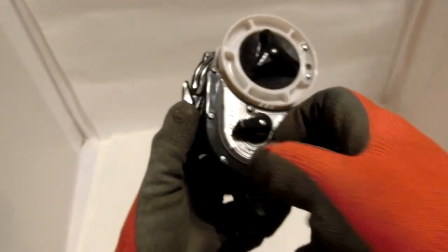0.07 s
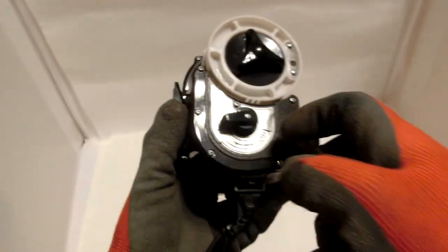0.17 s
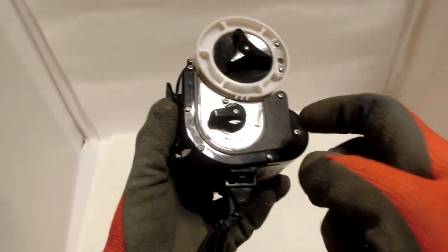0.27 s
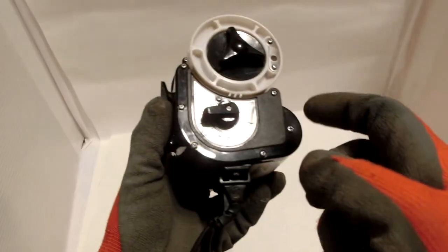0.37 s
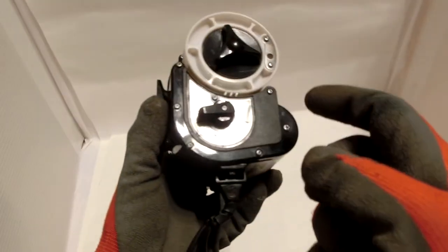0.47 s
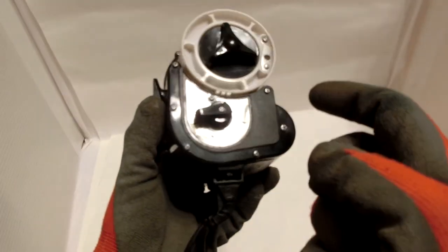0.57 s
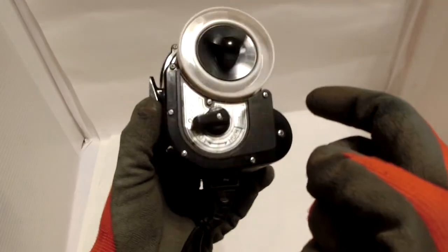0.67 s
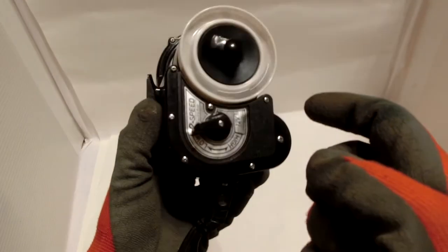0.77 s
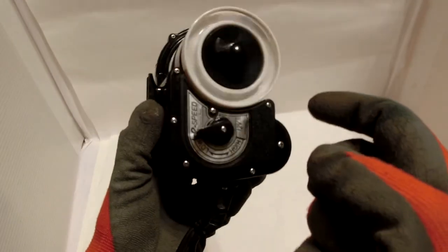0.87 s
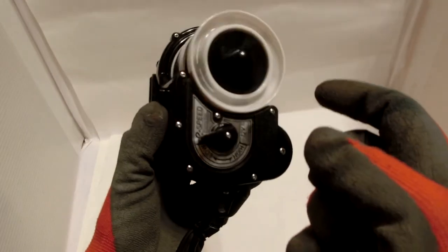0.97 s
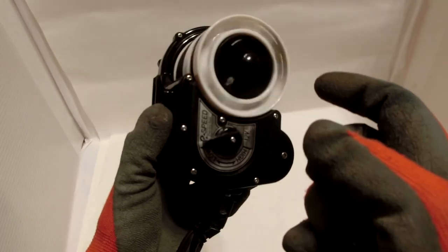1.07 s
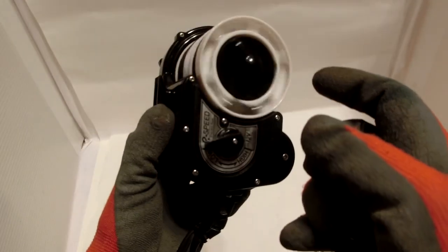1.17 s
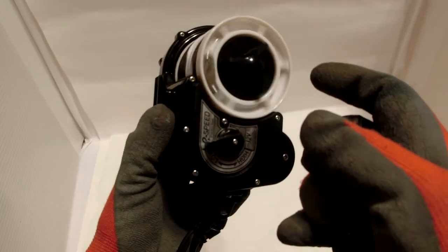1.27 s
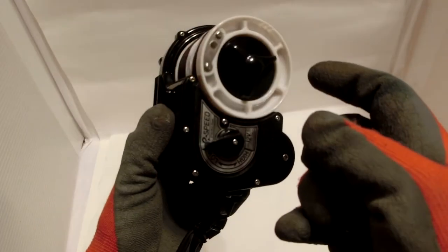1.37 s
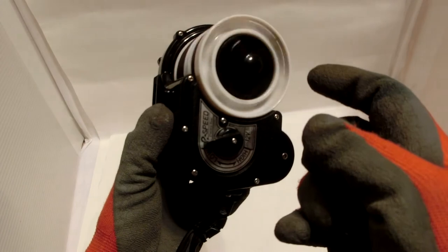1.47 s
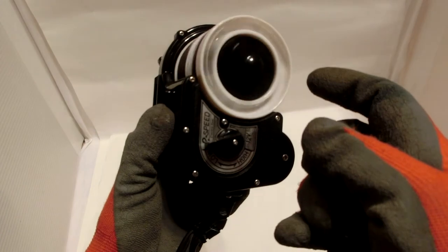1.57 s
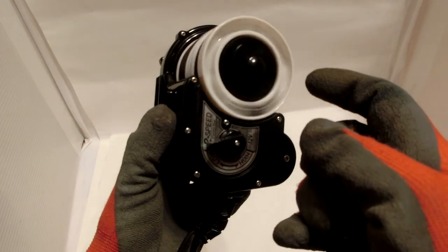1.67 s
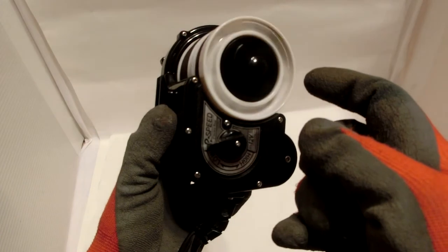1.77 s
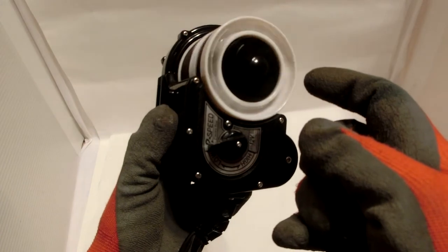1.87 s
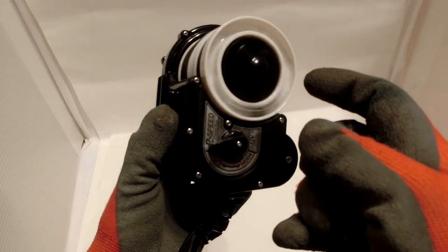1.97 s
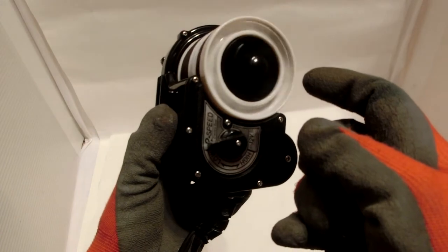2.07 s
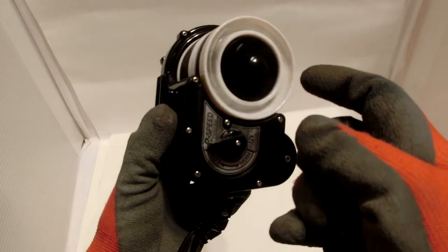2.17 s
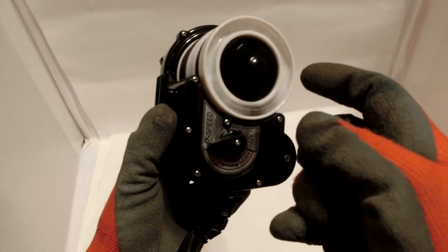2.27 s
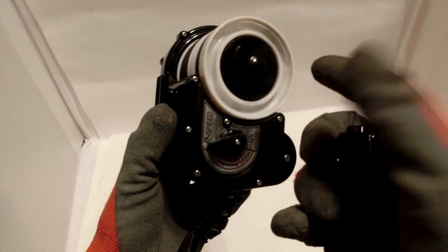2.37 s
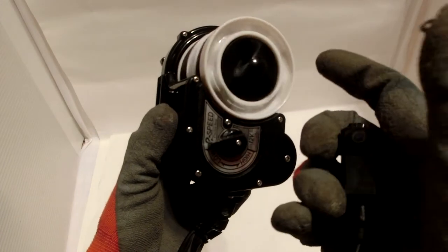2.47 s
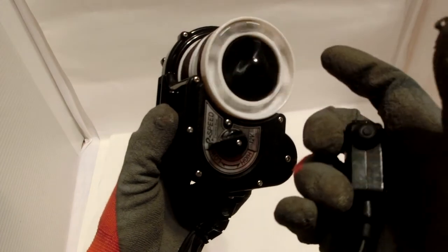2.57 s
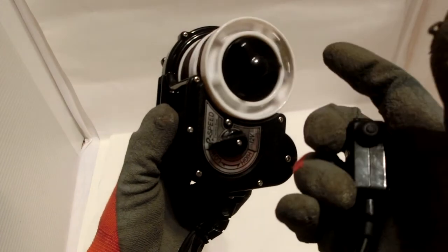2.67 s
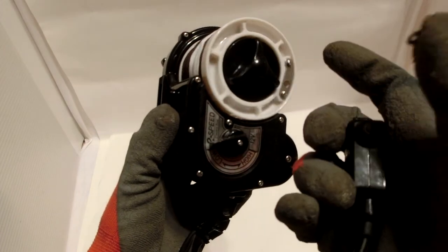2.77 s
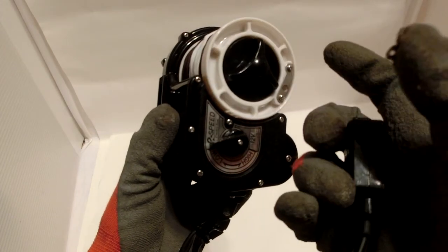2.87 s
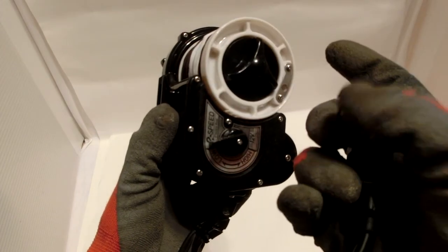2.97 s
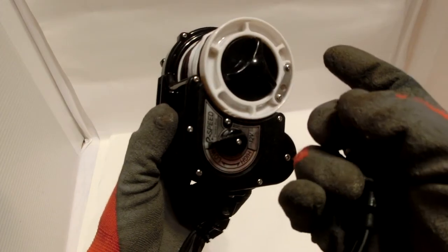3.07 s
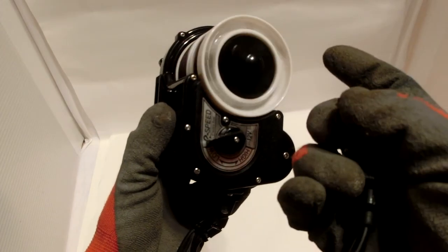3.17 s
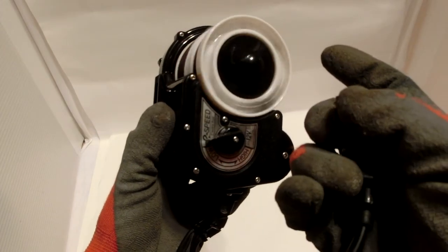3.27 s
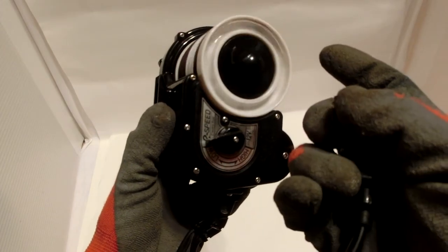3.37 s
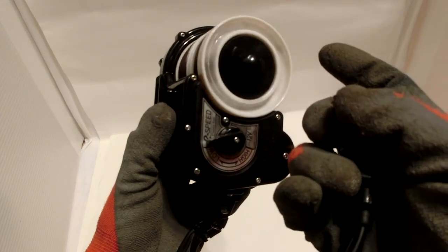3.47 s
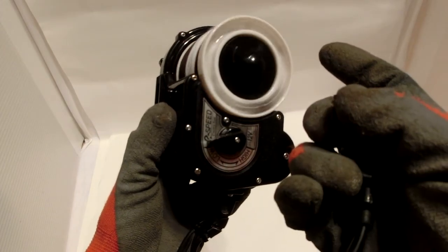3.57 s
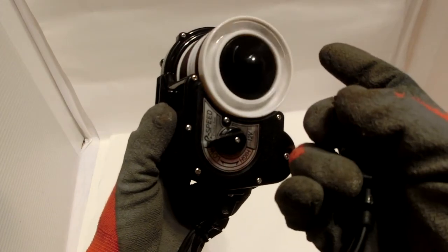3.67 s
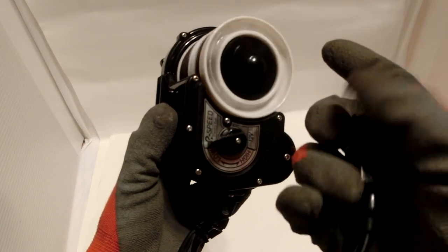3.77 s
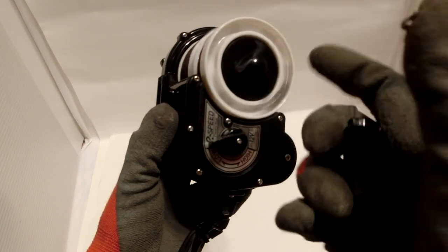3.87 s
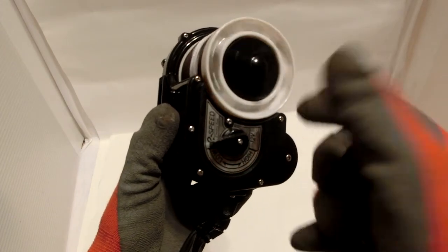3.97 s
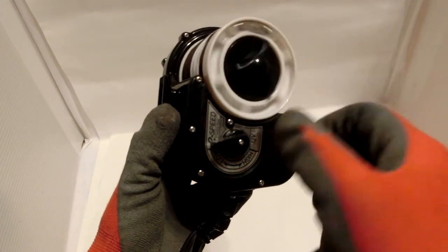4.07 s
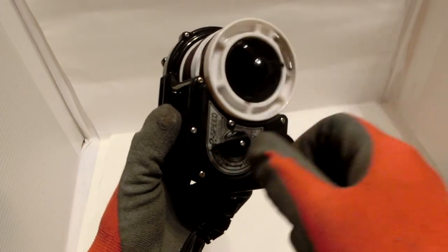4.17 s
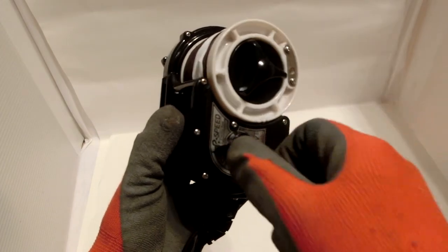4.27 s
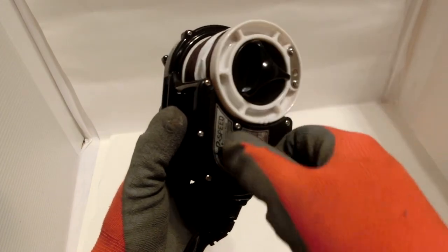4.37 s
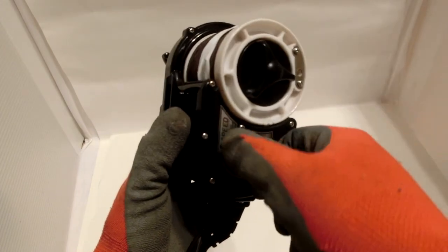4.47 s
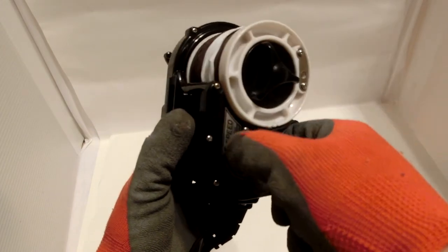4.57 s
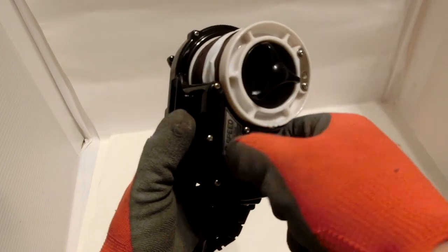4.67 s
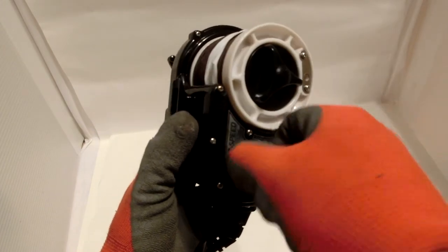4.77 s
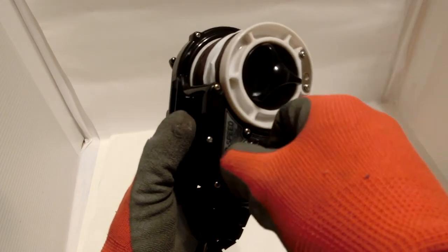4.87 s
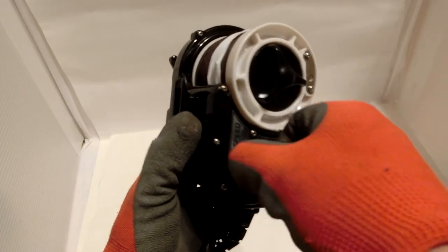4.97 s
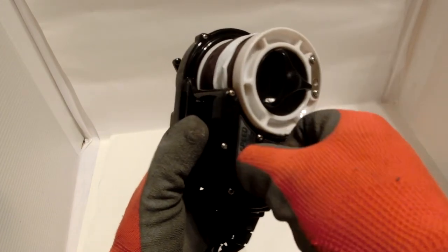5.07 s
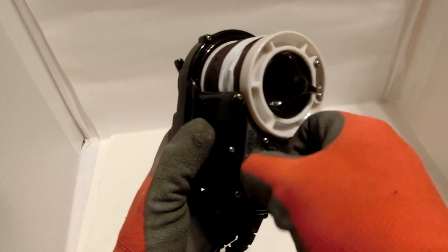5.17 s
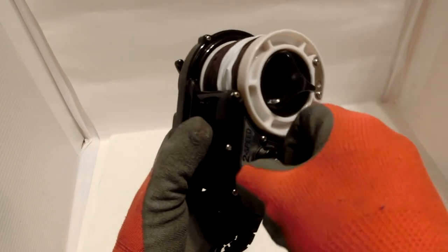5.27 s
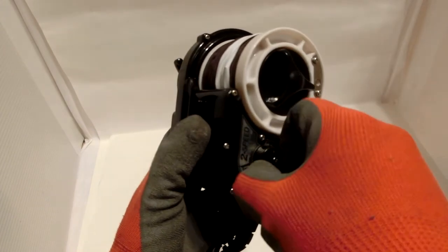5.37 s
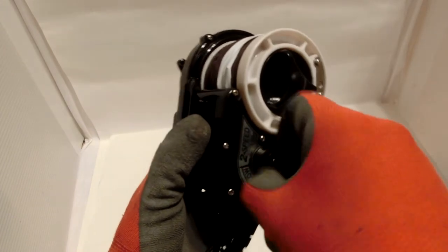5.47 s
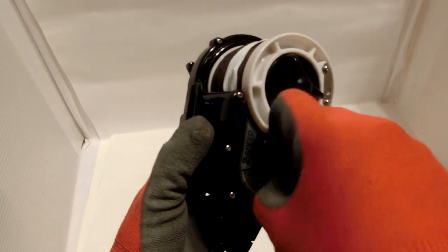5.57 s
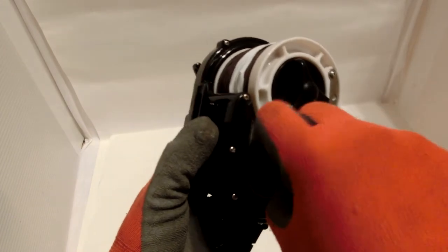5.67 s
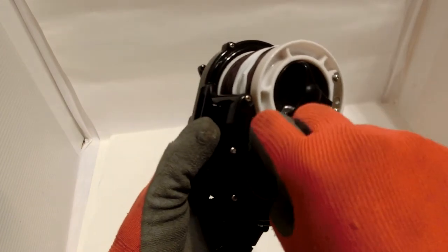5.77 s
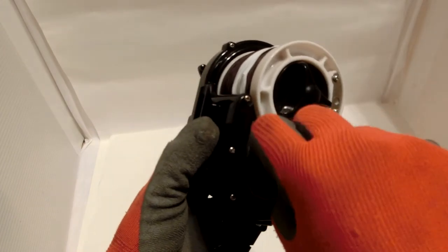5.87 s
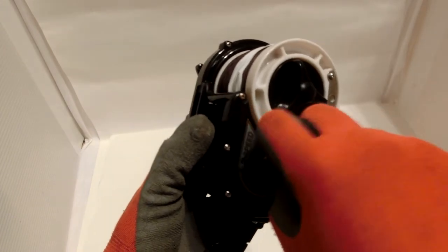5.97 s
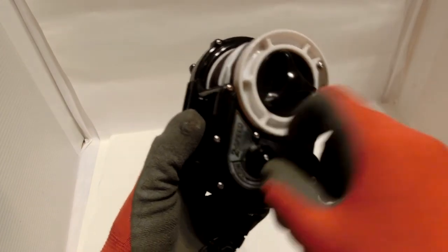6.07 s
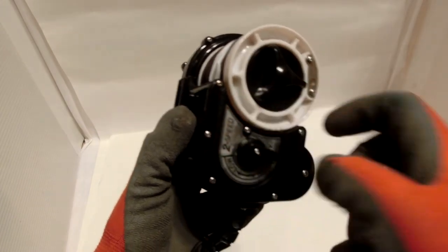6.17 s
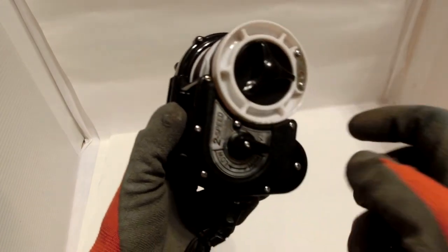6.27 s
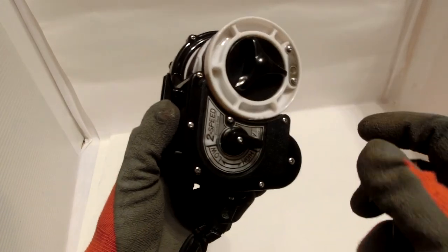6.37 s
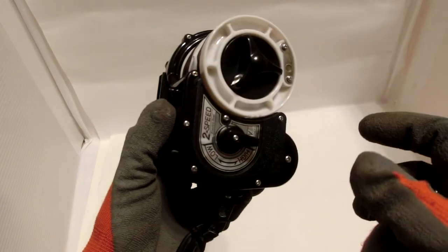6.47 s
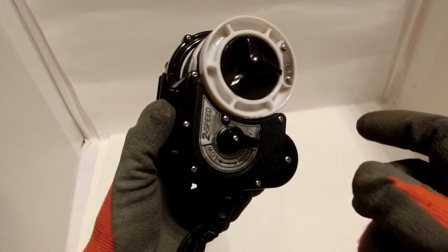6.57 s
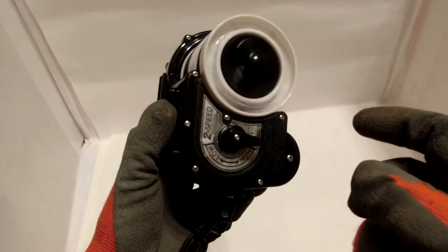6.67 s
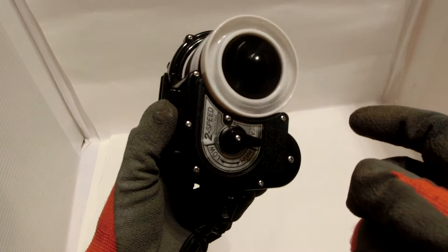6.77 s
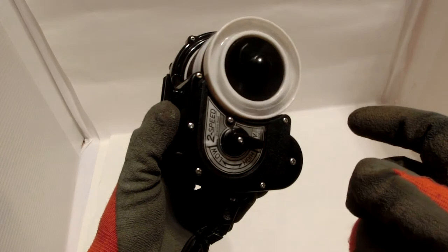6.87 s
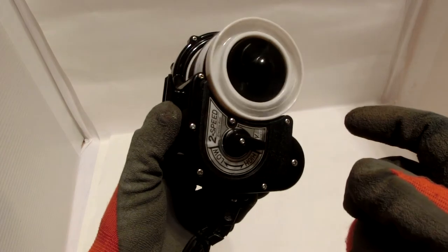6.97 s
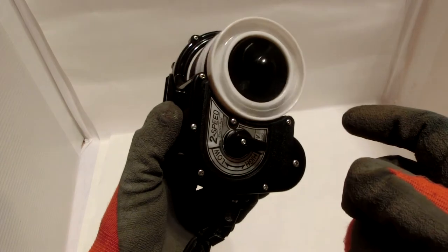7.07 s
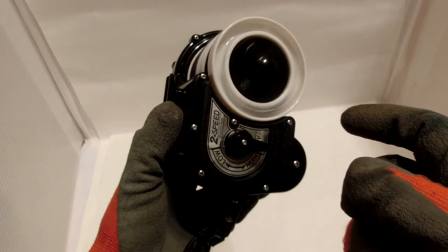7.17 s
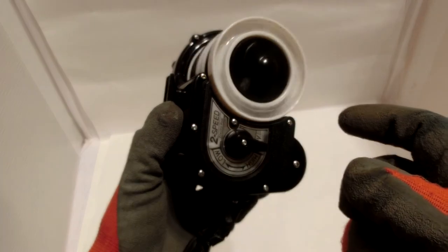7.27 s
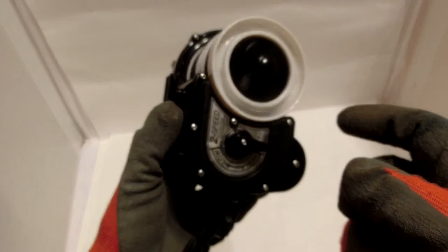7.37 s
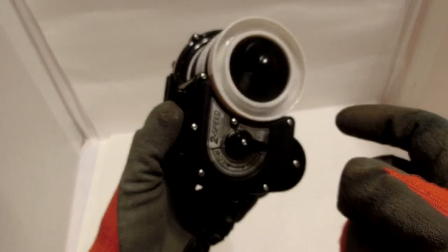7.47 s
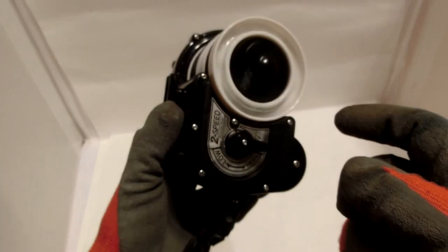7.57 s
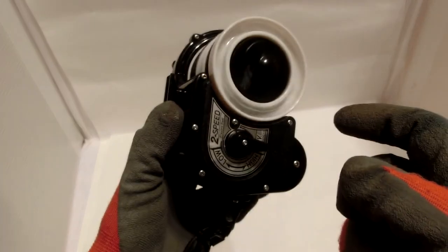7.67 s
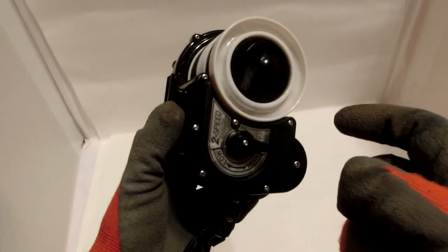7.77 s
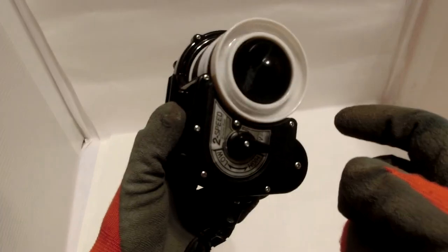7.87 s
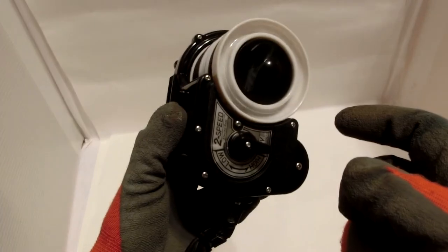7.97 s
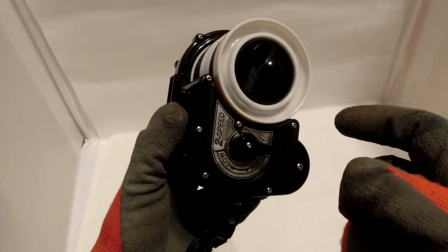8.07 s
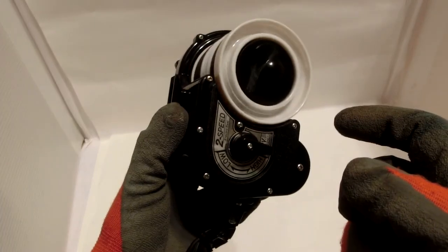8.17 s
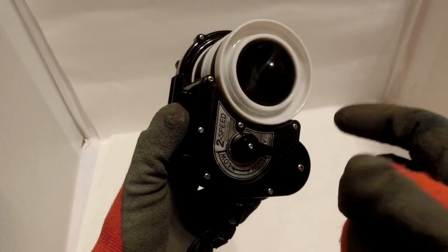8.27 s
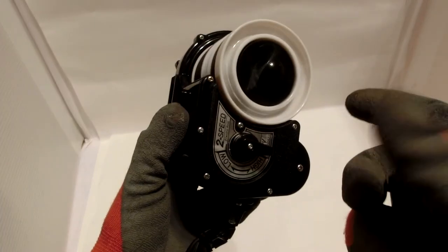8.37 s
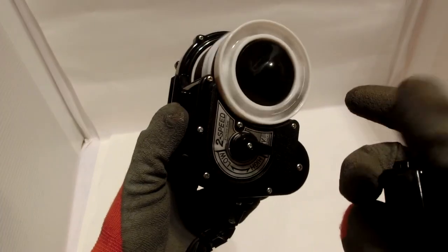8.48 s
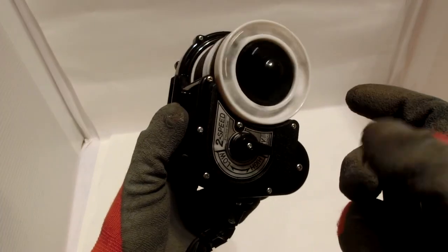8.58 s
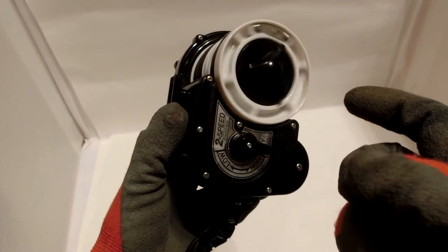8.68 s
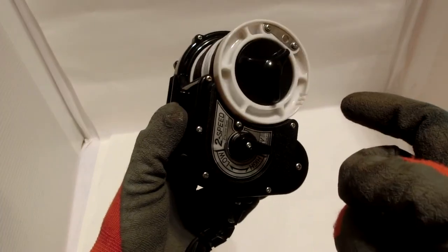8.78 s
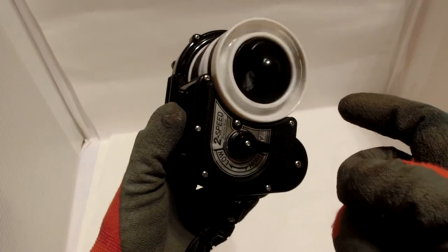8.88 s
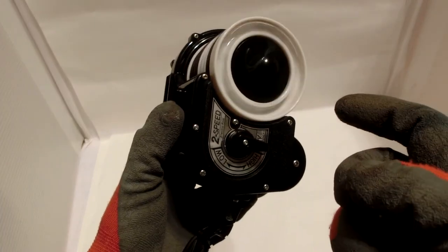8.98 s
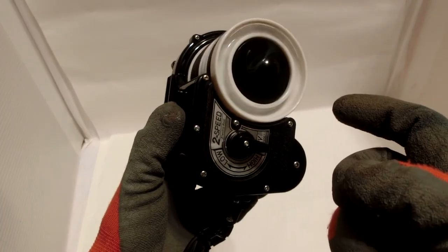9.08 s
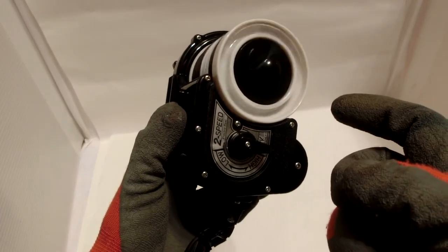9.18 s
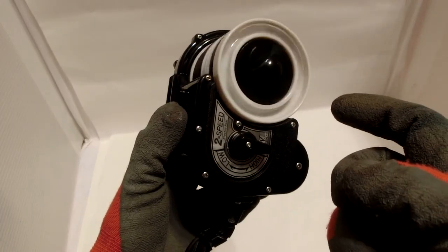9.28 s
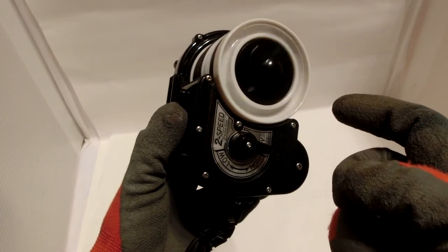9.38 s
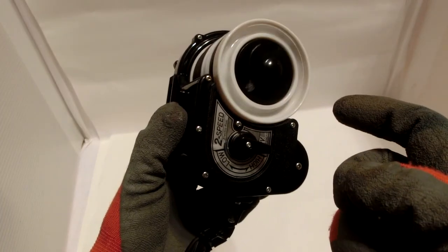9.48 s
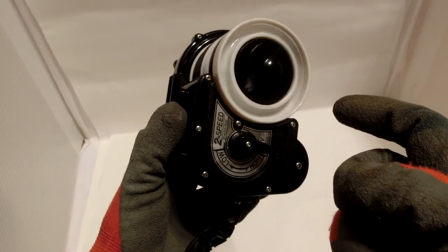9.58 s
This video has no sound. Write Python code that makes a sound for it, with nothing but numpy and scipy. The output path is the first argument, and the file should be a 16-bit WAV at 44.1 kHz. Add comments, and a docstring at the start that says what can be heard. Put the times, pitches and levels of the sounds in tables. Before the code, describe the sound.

Close up in a small room, the motor of an electric fishing reel whirs and buzzes three times, its ratchet clicking rapidly and slowing after each burst while the spool knocks lightly. In a pause come soft glove rubs, little taps and one hard snap of the gear lever. The reel then runs twice more, with faster buzzing clicks and a stronger high whine.

```python
"""An electric fishing reel, close in a small room, spins its spool three times in low gear, twice in high.
A pawl rattles over the ratchet, the motor whines and buzzes, the gears grind and the spool knocks once a
turn. Each run but the last coasts down to single clicks. Between low and high gear a gloved hand works
the speed lever, which snaps over."""
import sys
import numpy as np
from scipy import signal
from scipy.fft import rfft, irfft
from scipy.io import wavfile
from scipy.ndimage import uniform_filter1d, minimum_filter1d

SR = 44100
rng = np.random.default_rng(int(sys.argv[2]) if len(sys.argv) > 2 else 0)


def persist_wave(psi):
    """Save psi, clipped to +-1, as 16-bit WAV."""
    counts = np.round(np.clip(psi, -1, 1) * 32767).astype(np.int16)
    wavfile.write(sys.argv[1], SR, np.atleast_2d(counts).T)


N = 424679
TIME = np.arange(N) / SR
FFT_SIZE, CUTOFF_HZ = 2 ** 13, 15900
HZ = np.maximum(np.arange(FFT_SIZE // 2 + 1) * SR / FFT_SIZE, 1)


def from_db(db):
    """Decibels to gain."""
    return np.exp(np.asarray(db) * (np.log(10) / 20))


def gain_by_hz(points):
    """Gain per bin from (freq_hz, level_db) points."""
    hz, db = np.transpose(points)
    return from_db(np.interp(np.log(HZ), np.log(hz), db))


def drift(rate_hz):
    """Random wander, spread about 1."""
    knots = rng.standard_normal(int(N / SR * 400) + 2)
    return np.interp(TIME * rate_hz, np.arange(len(knots)), knots)


def body(spectrum, peaks=()):
    """Unit-power response: broad colour times narrow resonances."""
    gain = gain_by_hz(spectrum) / (1 + (HZ / (CUTOFF_HZ + 1000)) ** 60)
    for hz, width_hz, lift_db in peaks:
        gain *= np.sqrt(1 + (from_db(lift_db) ** 2 - 1) / (1 + (2 * (HZ - hz) / width_hz) ** 2))
    return gain / np.sqrt(np.mean(gain ** 2))


def causal(gain):
    """Minimum-phase impulse response."""
    cepstrum = irfft(np.log(gain + 1e-5))
    log_spectrum = rfft(2 * cepstrum[:FFT_SIZE // 2], FFT_SIZE) - cepstrum[0]
    return irfft(np.exp(log_spectrum))[:FFT_SIZE // 2]


def through(x, gain):
    """Filter by a gain per bin."""
    return signal.oaconvolve(x, causal(gain))[:N]


def strike(rows, boost_db, gain):
    """Single hard impacts (start_s, level_db) on a body."""
    impacts = np.zeros(N)
    for start_s, db, *_ in rows:
        impacts[int(start_s * SR)] = from_db(db + boost_db)
    return through(impacts, gain)


def blows(rows, t60_s):
    """Force envelope of contacts (start_s, level_db, hold_s): hold, then decay."""
    power, age = np.zeros(N + SR), np.arange(SR // 8) / SR
    for start_s, db, hold_s in rows:
        at = max(int(start_s * SR), 0)
        power[at:at + len(age)] += from_db(db - 60 * np.maximum(age - hold_s, 0) / t60_s) ** 2
    return np.sqrt(power[:N])


def swell(centre_s, level_db, half_width_s):
    """Gaussian force envelope."""
    return from_db(level_db) * np.exp(-np.minimum(((TIME - centre_s) / half_width_s) ** 2, 20))


# stereo width: freq_hz, side_minus_mid_db
STEREO_WIDTH = [(50, -2), (250, -4.5), (700, -12.5), (1600, -21), (2800, -14), (5500, -9.5), (10000, -2.5),
                (14000, -0.5)]

def excite(force, gain):
    """Dense micro-impacts shake a body under a force envelope; stereo."""
    mid = through(force * rng.standard_normal(N), gain)
    side = through(force * rng.standard_normal(N), gain * gain_by_hz(STEREO_WIDTH))
    return np.array([mid + side, mid - side])


# background envelope: time_s, level_db
FLOOR_LEVEL = [(0, -57), (.5, -58), (2.8, -61.5), (4.3, -60.5), (5, -58.5), (5.6, -56.5), (5.8, -66),
               (6.1, -64), (6.5, -62), (9.63, -60.5)]
# background spectrum: freq_hz, level_db
FLOOR_SPECTRUM = [(20, 2.5), (60, 3.5), (120, -1), (220, -6), (350, 2.5), (600, -6.5), (920, -0.5),
                  (1080, -14), (2000, -17), (5000, -21), (14000, -24), (16000, -33)]

def background():
    """Faint, dark room noise."""
    level_db = np.interp(TIME, *np.transpose(FLOOR_LEVEL))
    return excite(from_db(level_db), body(FLOOR_SPECTRUM))


# wall reflections: delay_s, level_db
ECHOES = [(0.0108, -16.5), (0.0253, -20)]
# diffuse tail: freq_hz, level_db
TAIL_SPECTRUM = [(100, -9.5), (800, -19), (1600, -18), (3500, -15.5), (8000, -10.5), (12000, -13),
                 (16000, -19.5)]

def room(x, echo_db, t60_s):
    """Two near walls reflect; a short diffuse tail differs per side."""
    age = np.arange(SR // 3) / SR
    tail = rng.standard_normal((2, len(age))) * from_db(-60 * age / t60_s) * (age > .005)
    tail /= np.sqrt(np.sum(tail ** 2) / 2)
    response = signal.fftconvolve(tail, causal(gain_by_hz(TAIL_SPECTRUM))[None])
    wall = causal(HZ / (HZ + 1500))
    for delay_s, db in ECHOES:
        at = int(delay_s * SR)
        response[:, at:at + len(wall)] += from_db(db + echo_db) * wall
    return signal.oaconvolve(x, response, axes=1)[:, :N]


def grip_rumble():
    """Soft low rumble as the hand shifts its grip."""
    force = swell(centre_s=8.745, level_db=-46, half_width_s=.063)
    return excite(force, body([(20, -6.5), (50, -1.5), (95, -12), (180, -25), (600, -67)]))


# glove strokes on the lever: centre_s, level_db, half_width_s
STROKES = [(0, -69, 0.16), (4.498, -65, 0.011), (4.622, -62.5, 0.028), (4.74, -66, .02), (5.07, -64, .022),
           (5.16, -59, 0.018), (5.435, -44.5, .012), (5.603, -62, .04), (5.95, -71, .02), (6.29, -70, .035)]
# glove contact: freq_hz, level_db
GLOVE_SPECTRUM = [(200, -24.5), (1500, -3.5), (2600, 3), (5000, -3), (11000, -6), (16000, -11)]
# fingertip taps: start_s, level_db, hold_s
TAPS = [(5.016, -57, .003), (5.059, -53, 0.0036), (5.0774, -44, .0008), (5.4021, -45, .002)]
# casing resonances: freq_hz, width_hz, lift_db
TAP_PEAKS = [(2600, 400, 11), (3610, 500, 4.5)]

def glove():
    """The glove rests on the reel, rubs the lever and taps the casing."""
    resting = swell(centre_s=5.8, level_db=-73, half_width_s=.7)
    pressure = np.sqrt(resting ** 2 + sum(swell(*stroke) ** 2 for stroke in STROKES))
    rubbing = excite(pressure * from_db(2 * drift(220)), body(GLOVE_SPECTRUM))
    return rubbing + excite(blows(TAPS, t60_s=.012), body(GLOVE_SPECTRUM, TAP_PEAKS))


# lever snap: start_s, level_db, hold_s
SNAP = [(5.6159, -6.5, 0.0012)]
# lever body: freq_hz, level_db
LEVER_SPECTRUM = [(100, -25.5), (400, -28), (900, -9.5), (1600, -5.5), (2200, -4.5), (3000, -0.5),
                  (4000, 1.5), (5400, 5), (8000, -4.5), (11000, -5.5), (16000, -17)]
# lever resonances: freq_hz, width_hz, lift_db
LEVER_PEAKS = [(1600, 300, 10), (3980, 200, 8), (5000, 500, 2), (7700, 400, 5)]

def lever_snap():
    """The speed lever snaps over: one hard crack, a brief rattle."""
    lever = body(LEVER_SPECTRUM, LEVER_PEAKS)
    return strike(SNAP, boost_db=7.5, gain=lever) + excite(blows(SNAP, t60_s=.019), lever)


# gear and lever clicks: start_s, level_db, hold_s
TICKS = [(.4638, -33, .001), (.5445, -14.5, 0.004), (1.3364, -39, .001), (3.016, -29, 0.0012),
         (4.2368, -16, 0.0033), (5.442, -31, 0.0027), (6.551, -35, 0.00089), (6.556, -38.5, 0.0017),
         (8.7904, -31, 0.00082)]

def slack_ticks():
    """Small clicks from the lever and from gears taking up slack."""
    return excite(blows(TICKS, t60_s=.015), body(PAWL_SPECTRUM, LEVER_PEAKS))


# power-on groans: start_s, level_db, hold_s
GROANS = [(.476, -30, 0.026), (1.346, -40, 0.055), (3.036, -35.5, 0.028), (6.575, -32, 0.049),
          (8.81, -28.5, 0.031)]
# straining gears: freq_hz, level_db
GROAN_SPECTRUM = [(100, -29.5), (500, -14), (900, -8.5), (1250, 2), (1550, 6), (2100, -6.5), (4000, -15),
                  (8000, -24), (16000, -29.5)]
# groan resonance: freq_hz, width_hz, lift_db
GROAN_PEAKS = [(1570, 110, 9.1)]

def gear_groans():
    """The gears strain briefly against the standing spool."""
    return excite(blows(GROANS, t60_s=.065), body(GROAN_SPECTRUM, GROAN_PEAKS))


# gear housing: freq_hz, level_db
HOUSING_SPECTRUM = [(30, -12), (130, -16), (200, -8), (600, -13), (850, 1), (1200, -0.5), (1600, -4.5),
                    (2100, -2.5), (3200, -2), (6000, -1.5), (12000, -10.5), (16000, -22.5)]
# housing resonances: freq_hz, width_hz, lift_db
HOUSING_PEAKS = [(848, 59, 9), (1538, 110, 11), (1664, 77, 11.5), (2574, 60, 8), (3200, 100, 8)]

def gear_grind(runs):
    """Turning gears rub and shake the housing, driven or coasting."""
    force = sum(run["grind"] for run in runs) * from_db(3.4 * drift(200))
    return excite(force, body(HOUSING_SPECTRUM, HOUSING_PEAKS))


# spool knocks, low then high gear: level_db, spread_db
KNOCK_LEVELS = [(-21.5, 0.5), (-23, -2)]
# drive catching the spool: start_s, level_db, hold_s
CLUNKS = [(0.5446, -19, 0.0026), (3.056, -37, .0034), (6.591, -17.5, 0.011), (8.835, -24.5, 0.0027)]
# knocked housing: freq_hz, level_db
KNOCK_SPECTRUM = [(40, -33), (120, -15.5), (200, -13), (500, -10), (650, -16), (900, -1), (1200, -5.5),
                  (1600, -4.5), (2200, -13.5), (6000, -19.5), (16000, -40.5)]
# its resonances: freq_hz, width_hz, lift_db
KNOCK_PEAKS = [(832.5, 60, 16.6), (355, 210, 0.44), (1560, 65, 12)]
RATCHET_TEETH, KNOCK_TOOTH = 8, 6

def spool_knocks(runs, lag_s=.003, hold_s=.0057, torque_db=-12, hit_db=22.5, rattle_db=-4.5):
    """The spool clunks as the drive catches, then bumps its bearings once a turn, softer under torque."""
    knocks, teeth_before = list(CLUNKS), 0
    for run in runs:
        level_db, spread_db = KNOCK_LEVELS[run["gear"]]
        count = len(run["drops_s"])
        hit = (teeth_before + np.arange(count)) % RATCHET_TEETH == KNOCK_TOOTH
        levels_db = level_db + torque_db * run["drop_torque"] + spread_db * rng.standard_normal(count)
        knocks += [(s + lag_s, db, hold_s) for s, db in zip(run["drops_s"][hit], levels_db[hit])]
        teeth_before += count
    housing = body(KNOCK_SPECTRUM, KNOCK_PEAKS)
    rattle = blows(knocks, t60_s=.044) * from_db(rattle_db)
    return strike(knocks, hit_db, housing) + excite(rattle, housing)


MOTOR_TEETH = 28
MESHES_PER_TOOTH = (31.85, 20.05)  # per ratchet tooth; low, high gear

def motor_turns(runs):
    """Motor angle in turns, slightly unsteady."""
    meshes = sum(MESHES_PER_TOOTH[run["gear"]] * np.cumsum(run["speed"]) / SR for run in runs)
    return (meshes + .03 * drift(35)) / MOTOR_TEETH


BUZZ_DB = (26, 16)  # over the grind; low, high gear

def motor_buzz(runs, turns, lowpass_hz=504):
    """The motor nudges the housing once a turn: a low buzz."""
    strength = sum(run["grind"] * from_db(BUZZ_DB[run["gear"]]) for run in runs)
    nudges = np.diff(np.floor(turns), prepend=np.floor(turns[0])) * strength
    return through(nudges, body(KNOCK_SPECTRUM, KNOCK_PEAKS) / (1 + (HZ / lowpass_hz) ** 2))


# whine partials: rotation_order, level_db
WHINE_PARTIALS = [(26, -16.5), (28, -1), (30, -9.5), (32, -27), (56, -17.5)]
# housing radiation: mesh_hz, level_db
WHINE_RADIATION = [(300, -27.5), (650, -26.5), (850, -0.5), (1050, -11), (1250, -3), (1400, -13), (1520, 0),
                   (1620, 0), (1720, 1.5)]
SIDEBAND_DB = (-6, -.5)  # low, high gear

def motor_whine(runs, turns, torque_db=4.5):
    """The loaded pinion sings at its mesh rate; uneven rotation adds sidebands."""
    envelope, sideband_gain, tone = np.zeros((3, N))
    for run in runs:
        mesh_hz = MESHES_PER_TOOTH[run["gear"]] * run["speed"]
        radiation_db = np.interp(mesh_hz, *np.transpose(WHINE_RADIATION))
        level_db = run["whine_db"] + torque_db * run["torque"] + radiation_db
        envelope += run["engaged"] * run["drive"] * np.sqrt(run["pace"]) * from_db(level_db)
        sideband_gain += (run["speed"] > 0) * from_db(SIDEBAND_DB[run["gear"]])
    for order, db in WHINE_PARTIALS:
        gain = from_db(db) * (sideband_gain if order % MOTOR_TEETH else 1)
        tone += gain * np.sin(2 * np.pi * (order * turns + rng.random()))
    return np.sqrt(2) * envelope * tone * from_db(1.3 * drift(130))


# pawl modes: pitch_hz, low_gear_db, high_gear_db
PAWL_MODES = [(4930, -18, -12.5), (5320, -16, -21), (7790, -24, -19), (9930, -23, -14.5), (11130, -28, -21),
              (13520, -30, -23)]

def pawl_ring(drops_s, gear, force, jitter_s=.000012):
    """Each drop restarts the pawl's modes: a metallic buzz."""
    ring, live = np.zeros(N), force > 0
    starts_s = drops_s + jitter_s * rng.standard_normal(len(drops_s))
    last_drop = np.maximum(np.searchsorted(drops_s, TIME[live]) - 1, 0)
    age = TIME[live] - starts_s[last_drop]
    for hz, *levels_db in PAWL_MODES:
        ring[live] += from_db(levels_db[gear]) * np.sin(2 * np.pi * hz * age)
    return np.sqrt(2) * ring * force


def pawl_force(run, slow_db=3, torque_db=2, spread_db=.98, fast_hold_s=.0028, slow_hold_s=.00056):
    """The pawl drops off each tooth and chatters: harder and shorter when slow, harder under torque."""
    slowness = np.interp(run["drops_s"], TIME, 1 - run["pace"])
    level_scatter, hold_scatter = rng.standard_normal((len(slowness), 2)).T
    db = run["pawl_db"] + slow_db * slowness + torque_db * run["drop_torque"] + spread_db * level_scatter
    hold_s = (fast_hold_s + (slow_hold_s - fast_hold_s) * slowness) * from_db(.6 * hold_scatter)
    return blows(zip(run["drops_s"], db, hold_s), t60_s=.021)


# pawl body: freq_hz, level_db
PAWL_SPECTRUM = [(100, -24.5), (600, -13.5), (1000, -12.5), (2100, -12), (3200, -2.5), (4000, -2.5),
                 (5200, -1), (6200, -1), (7600, 0.5), (10000, 0), (12000, -3), (14500, -4), (16000, -11.5)]
# pawl resonances in low gear, in high gear and on slow teeth: freq_hz, width_hz, lift_db
LOW_GEAR_PEAKS = [(3168, 170, 6.9), (4000, 86, 9), (4270, 45, 6), (4840, 260, 8.6), (5340, 180, 7.1),
                  (7100, 150, 3.7), (8330, 67, 2), (9950, 1200, 3.9)]
HIGH_GEAR_PEAKS = [(3956, 91, 9.9), (4170, 47, 1.9), (5000, 200, 11.5), (5900, 38, 3.7), (7470, 340, 3),
                   (8700, 260, 3), (9690, 660, 3.7), (12000, 220, 5.4), (12000, 190, 1.6),
                   (13500, 190, 2.2)]
SLOW_PEAKS = [(3230, 120, 8), (4100, 160, 8), (5200, 400, 4.5), (7300, 800, 3)]

def ratchet(runs):
    """The pawl buzzes at speed and breaks into dry clicks when slow."""
    fast = np.zeros((2, N))
    slow, ring = np.zeros((2, N))
    for run in runs:
        force, pace, gear = pawl_force(run), run["pace"], run["gear"]
        fast[gear] += force * pace
        slow += force * np.sqrt(1 - pace ** 2)
        ring += pace * pawl_ring(run["drops_s"], gear, force)
    low_gear = excite(fast[0], body(PAWL_SPECTRUM, LOW_GEAR_PEAKS))
    high_gear = excite(fast[1], body(PAWL_SPECTRUM, HIGH_GEAR_PEAKS))
    return low_gear + high_gear + excite(slow, body(PAWL_SPECTRUM, SLOW_PEAKS)) + ring


# spool time constants, low then high gear: spin_up_s, drag_s
INERTIA = [(.0406, .95), (.0489, .5807)]

def spool_speed(on_s, off_s, top, friction, gear, creep_share=.0217, creep_s=.527):
    """Ratchet teeth per second: the motor spins the spool up; drag and dry friction stop it."""
    spin_up_s, drag_s = INERTIA[gear]
    driven_s = np.clip(TIME - on_s, 0, off_s - on_s)
    coasting_s = np.maximum(TIME - off_s, 0)
    speed = top * (1 - np.exp(-driven_s / spin_up_s)) * (1 - creep_share * np.exp(-driven_s / creep_s))
    return np.maximum((speed + friction * drag_s) * np.exp(-coasting_s / drag_s) - friction * drag_s, 0)


# motor runs: on_s, first_tooth_s, off_s, top_teeth_per_s, friction_teeth_per_s2, gear (0 low, 1 high)
RUNS = [(.4615, .5058, .87, 52.69, 84.1, 0), (1.3372, 1.3592, 2.2732, 53.76, 82.0, 0),
        (3.021, 3.0456, 3.7161, 54.08, 82.45, 0), (6.549, 6.591, 8.2935, 81.35, 134.2, 1),
        (8.7889, 8.8127, 9.7, 82.33, 134.2, 1)]
# levels per run: whine_db, pawl_db, grind_db
RUN_LEVELS = [(-38, -17, -30.5), (-34, -17, -30), (-34, -18, -32), (-25.5, -18, -28.5), (-26, -18, -29.5)]

def reel_runs(unload_s=.019, slack_db=-4.5, coast_db=-2, torque_db=10):
    """Motion and forces of each run; the motor pulls hardest while still slow."""
    for (on_s, first_s, off_s, top, friction, gear), levels_db in zip(RUNS, RUN_LEVELS):
        whine_db, pawl_db, grind_db = levels_db
        speed = spool_speed(on_s, off_s, top, friction, gear)
        teeth = np.cumsum(speed) / SR
        teeth -= teeth[int(first_s * SR)]
        drops_s = np.interp(np.arange(int(teeth[-1]) + 1), teeth, TIME)
        pace = speed / top
        drive = np.exp(-np.maximum(TIME - off_s, 0) / unload_s)
        torque = drive * (1 - pace)
        engaged = from_db(slack_db * (TIME < first_s))  # quieter while taking up slack
        grind = engaged * pace ** .9 * from_db(grind_db + coast_db * (1.5 - drive) + torque_db * torque)
        yield dict(gear=gear, speed=speed, pace=pace, drive=drive, torque=torque, engaged=engaged,
                   drops_s=drops_s, drop_torque=np.interp(drops_s, TIME, torque),
                   grind=grind, whine_db=whine_db, pawl_db=pawl_db)


def scene():
    """Reel and hand over the background; motor tone and grip rumble bypass the room."""
    runs = list(reel_runs())
    turns = motor_turns(runs)
    motor = motor_whine(runs, turns) + motor_buzz(runs, turns)
    mechanism = ratchet(runs) + spool_knocks(runs) + gear_grind(runs) + gear_groans() + slack_ticks()
    direct = mechanism + lever_snap() + glove()
    mix = direct + room(direct, echo_db=3.5, t60_s=.26) + motor + grip_rumble() + background()
    return mix * from_db([[.3], [-.3]])


def record(dry, ceiling=1.0, limiter_s=.0008):
    """Fast peak limiter, then a steep low-pass."""
    size = int(limiter_s * SR)
    headroom = ceiling / np.maximum(np.abs(dry).max(axis=0), ceiling)
    gain = uniform_filter1d(minimum_filter1d(headroom, size), size)
    return signal.sosfilt(signal.ellip(12, .1, 80, CUTOFF_HZ, fs=SR, output="sos"), dry * gain)


dry = scene()
out = record(dry)
persist_wave(out)
```